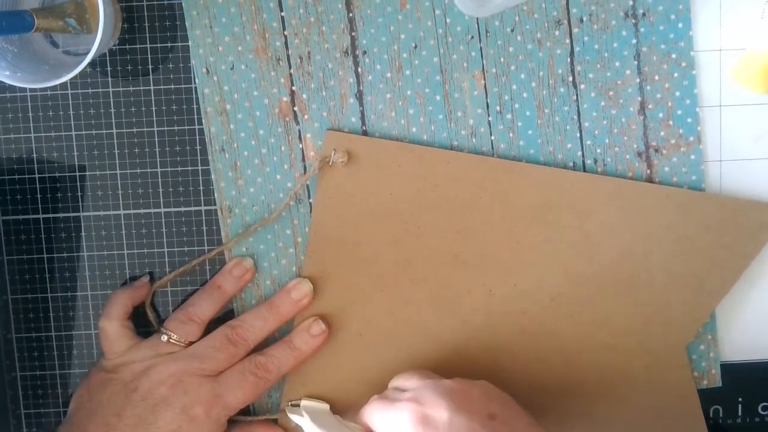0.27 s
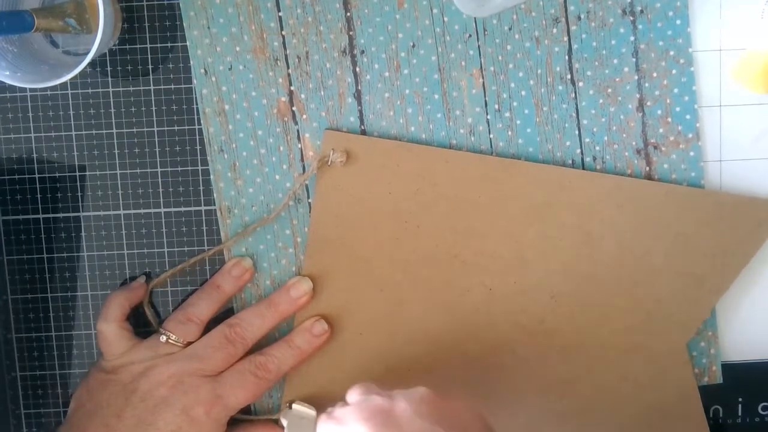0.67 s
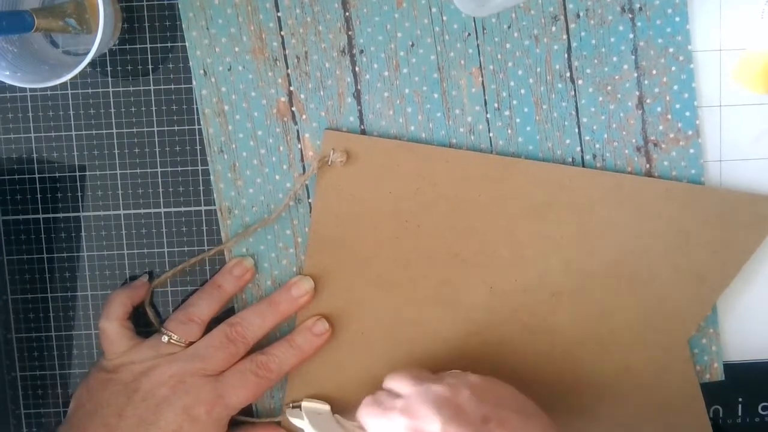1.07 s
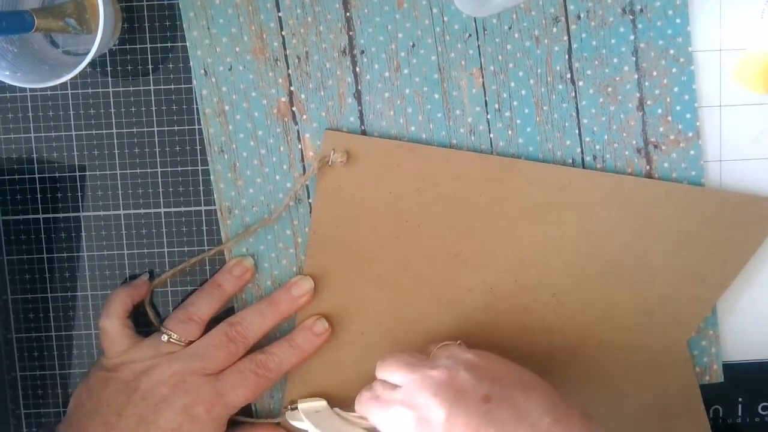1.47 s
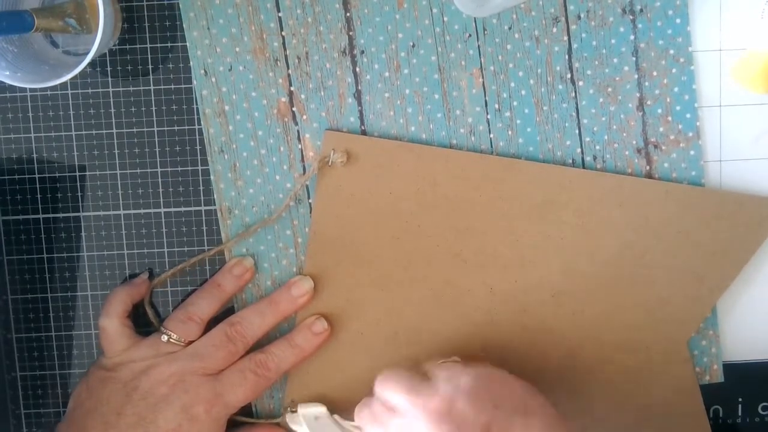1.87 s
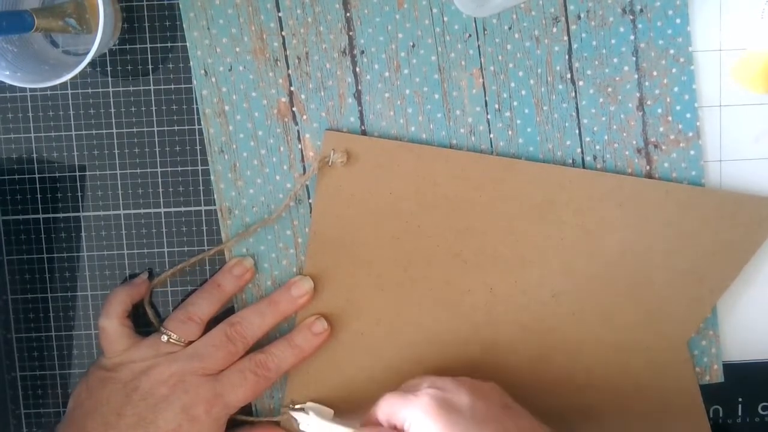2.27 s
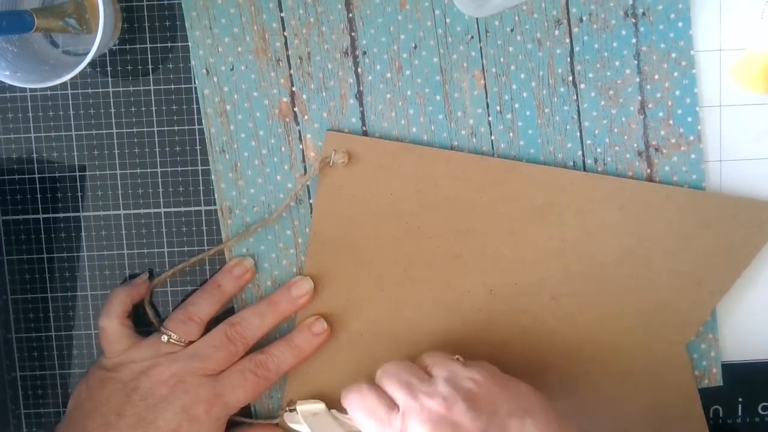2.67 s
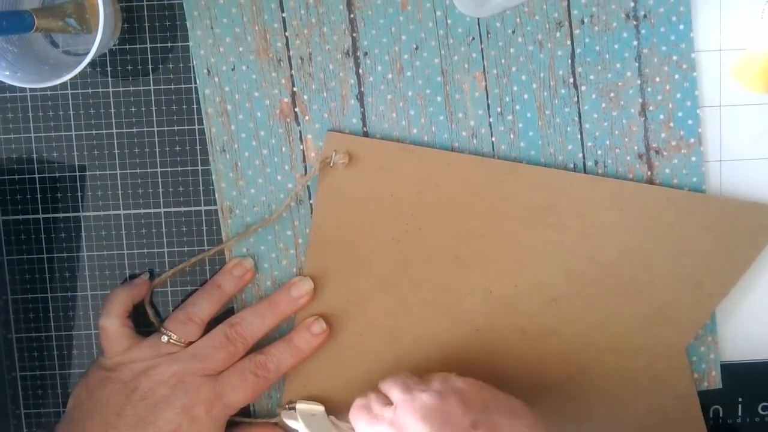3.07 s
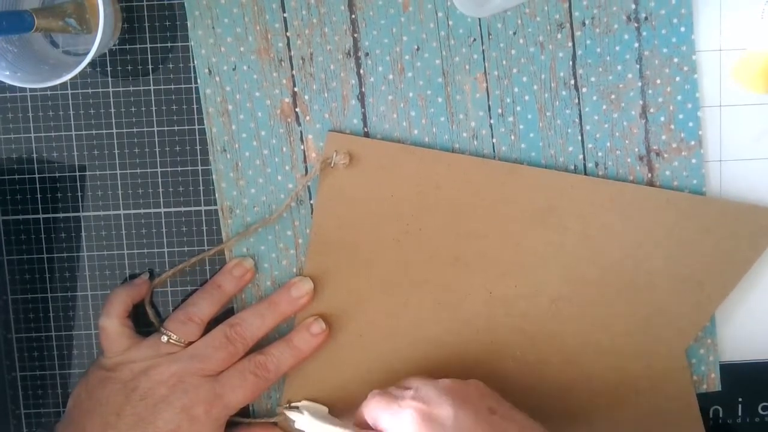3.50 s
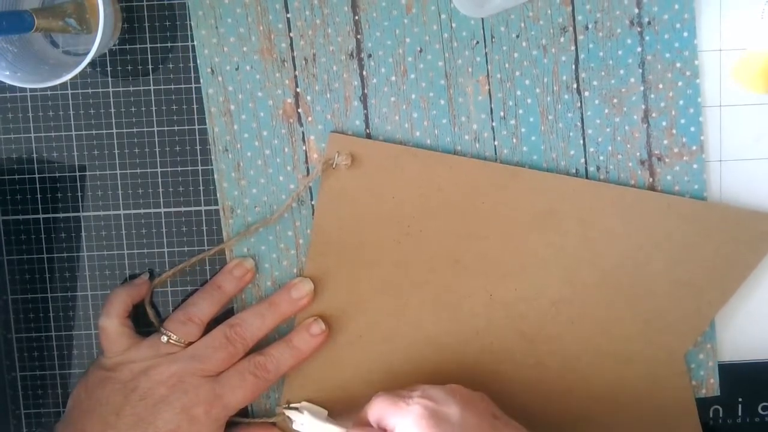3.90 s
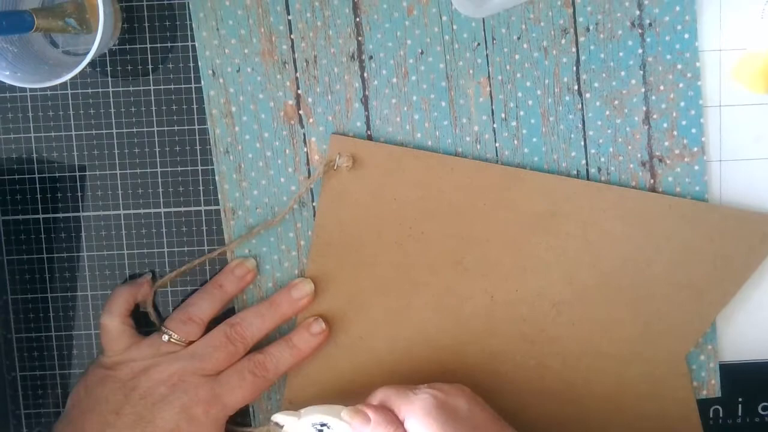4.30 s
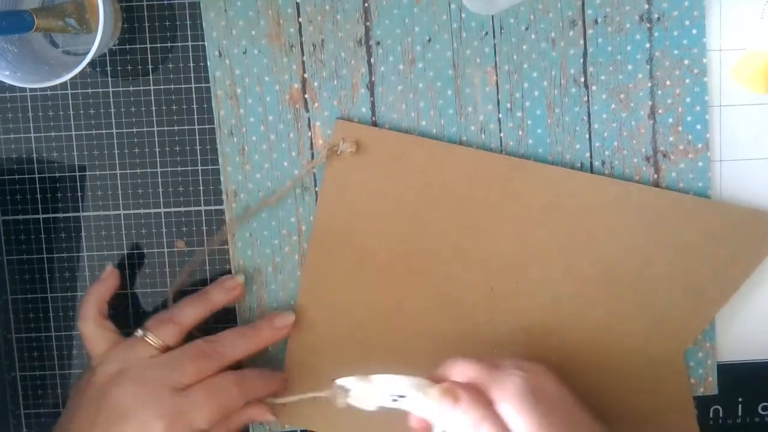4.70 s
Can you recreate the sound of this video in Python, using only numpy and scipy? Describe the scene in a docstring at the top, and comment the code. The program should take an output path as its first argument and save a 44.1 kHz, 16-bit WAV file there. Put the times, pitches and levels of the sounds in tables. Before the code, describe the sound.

Close up, in a small, dry room, soft uneven ticks and knocks come from a thin wooden board as a metal tool levers at a staple. Faint scrapes and tiny steel clinks fall between them. Near the end the staple releases with a single loud, sharp crack, and the board bumps the table. A little clinking follows over quiet room hiss and hum.

```python
"""Prying a staple from a board

A steel staple remover levers a staple out of a thin wooden board on a craft table, close up.
The staple gives in jerks that knock the board, the blade clinks and scrapes by stick-slip, and
the staple lets go with one loud snap that rings steel and wood. A low drone swells briefly at
the start. Behind lies a small, dry room with hiss, hum and a faint electronic whine."""
import sys
import numpy as np
from scipy import signal
from scipy.fft import rfft, irfft, next_fast_len
from scipy.io import wavfile
from scipy.ndimage import map_coordinates

SR = 44100
rng = np.random.default_rng(int(sys.argv[2]) if len(sys.argv) > 2 else 0)


def waveform_to_disk(signal):
    """Save audio, clipped to [-1, 1], as 16-bit WAV at the path in sys.argv[1]."""
    frames = np.transpose(np.atleast_2d(signal))
    scaled = np.clip(frames, -1, 1) * 32767
    samples = np.round(scaled).astype(np.int16)
    wavfile.write(sys.argv[1], SR, samples)


N = 213796

# blade resonances: pitch_hz, width_hz, gain_db
STEEL_MODES = [(1810, 290, -5), (3170, 180, -8.5), (3660, 160, -5), (3927, 210, 7.5), (4030, 420, 5),
               (6310, 260, -10), (7814, 190, -2.5), (9150, 290, -19), (10720, 280, -6.5), (11400, 550, -21),
               (14340, 6500, -24)]
# board resonances: pitch_hz, width_hz, gain_db
BOARD_MODES = [(109, 61, -15), (172.9, 150, -5.5), (299.8, 14, -1.5), (485, 77, -8), (567, 45, -0.5),
               (690, 113, 0.5), (846, 144, -1.5), (1017, 73, 1.5), (1310, 150, -15.5), (1760, 110, -18.5),
               (1990, 230, -27.5), (3958, 710, -10)]
# staple legs tear free, board drops back: start_s, steel_db, favoured_hz, board_db, table_db
SNAP_IMPACTS = [(4.0443, -0.5, 7820, -6.5, -31), (4.0472, -10, 4010, -9.5, -44),
                (4.0538, -8, 10720, -16, -20), (4.0547, -13, 3900, -6, -19), (4.0748, -25.5, 7500, -9, -21),
                (4.083, -33.5, 7350, -13, -33)]


def snap():
    """The staple lets go with a crack: the blade rings, the board springs back and thumps the table."""
    out = np.zeros(N)
    for start_s, steel_db, favoured_hz, board_db, table_db in SNAP_IMPACTS:
        blade = contact(STEEL_MODES, favoured_hz, width_hz=1100, spread=0.54)
        wood = contact(BOARD_MODES, 670, width_hz=290, spread=0.45)
        ring = impact(blade, grit=0.45, t60_s=0.012)
        crack = impact(lambda f: resonance(f, 1900, 4100), grit=0.74, t60_s=0.04)
        knock = impact(wood, grit=0.035, t60_s=0.02)
        thump = impact(lambda f: resonance(f, 170, 220) ** 2, grit=0.035, t60_s=0.027)
        add(out, start_s, amp(steel_db) * (ring + amp(-14.5) * crack))
        add(out, start_s, amp(board_db - 1) * knock + amp(table_db - 1.5) * thump)
    return out


# jerks of the staple: start_s, level_db, favoured_hz, thud_re_knock_db
JERKS = [(0.294, -33.5, 943, -8), (0.415, -30, 940, -8.5), (0.532, -28, 940, -8), (0.595, -36, 980, -6),
         (0.87, -37.5, 860, -6), (0.939, -46.5, 660, -17), (1.048, -45, 640, -19), (1.315, -37, 667, -6),
         (1.432, -27, 994, -5), (1.912, -47.5, 660, -3), (2.539, -36, 920, -17), (2.717, -24.5, 980, -9),
         (2.909, -43, 1000, -8), (2.986, -39.5, 710, -2.5), (3.034, -42.5, 730, -6), (3.188, -31, 703, -12),
         (3.373, -29.5, 850, -6), (3.604, -46, 700, -10), (3.706, -45, 690, -16), (3.831, -40, 770, -4.5),
         (3.903, -45.5, 806, -0.5), (3.945, -41, 740, -3), (4.014, -43.5, 690, -2), (4.634, -42, 670, -3)]


def ticks():
    """Each jerk knocks the board; a blunt push adds a thud, and hard jerks splinter a few fibres."""
    dull_above_hz, hard_jerk_db = 2630, -28
    out = np.zeros(N)
    for start_s, level_db, favoured_hz, thud_db in JERKS + creep(count=7):
        width_hz = 380 * (favoured_hz / 1000) ** 3  # sharp jerks high and broad, slow ones low and hollow
        wood = contact(BOARD_MODES, favoured_hz, width_hz, spread=0.22)
        knock = impact(lambda f: wood(f) / (1 + 1j * f / dull_above_hz), grit=0.008, t60_s=0.0075)
        thud = impact(lambda f: resonance(f, 512, 460) ** 2, grit=0.014, t60_s=0.013)
        splinter = impact(lambda f: resonance(f, 3500, 1000) ** 2, grit=0.6, t60_s=0.016)
        splinter_db = -29 + 0.5 * (level_db - hard_jerk_db)
        tick = knock + amp(thud_db) * thud + amp(splinter_db) * splinter
        add(out, start_s, amp(level_db + 0.5) * tick)
    return out


def creep(count):
    """Under the first pressure the staple creeps in faint, nearly even jerks; rows as in JERKS."""
    first_s, gap_s, jitter_s = 0.014, 0.034, 0.0032
    level_db, favoured_hz, thud_db = -47, 834, -26
    return [(abs(first_s + k * gap_s + jitter_s * late), level_db + 2 * strong, favoured_hz, thud_db)
            for k, (late, strong) in enumerate(rng.standard_normal((count, 2)))]


# steel clinks, mostly the blade's tip catching; the loud one at 4.14 s is the freed staple landing: start_s,
# level_db, favoured_hz
STEEL_CLINKS = [(0.0847, -54.5, 8400), (0.4479, -49, 7940), (0.7412, -53, 8400), (0.9247, -41, 11200),
                (0.9365, -37, 9600), (0.9442, -44, 11300), (1.2438, -49, 10900), (1.3129, -43.5, 10500),
                (1.535, -38, 11100), (1.6095, -45, 10100), (2.535, -51, 10800), (2.9828, -41, 7000),
                (3.9025, -49, 8000), (3.9459, -51, 8200), (4.1448, -28, 10800), (4.2416, -47.5, 10570),
                (4.2993, -51, 8440), (4.7046, -45, 10930)]


def clinks():
    """The blade's tip catches on the staple, and once the freed staple lands: each brief scratch rings the
    steel's upper modes."""
    out = np.zeros(N)
    for start_s, level_db, favoured_hz in STEEL_CLINKS:
        tip = contact(STEEL_MODES, favoured_hz, width_hz=4000, spread=0.45)
        clink = impact(lambda f: tip(f) * f / SR, grit=0.68, t60_s=0.029)
        add(out, start_s, amp(level_db + 1) * clink)
    return out


# hand pushes on the blade: start_s, hold_s, steel_db, wood_db
BLADE_STROKES = [(0.607, 0.043, -76, -54), (0.915, 0.054, -58, -56.5), (1.03, 0.18, -66, -70),
                 (1.493, 0.086, -55.5, -51.5), (1.643, 0.17, -72, -57), (1.912, 0.0095, -59.5, -56),
                 (2.203, 0.067, -76, -56.5), (2.545, 0.097, -68, -50.5), (2.722, 0.19, -69, -52.5),
                 (2.94, 0.039, -62, -44.5), (3.064, 0.16, -70.5, -52.5), (3.448, 0.096, -76, -53.5),
                 (4.624, 0.02, -55.5, -51)]


def scraping():
    """With each stroke the blade hisses along the staple and rubs on the wood."""
    steel_gain, wood_gain = amp(-77.5), amp(-73)  # the blade stirs a little between strokes
    for start_s, hold_s, steel_db, wood_db in BLADE_STROKES:
        push = swell(start_s, hold_s, attack_s=0.034, release_s=0.022)
        steel_gain = np.maximum(steel_gain, amp(steel_db - 5) * push)
        wood_gain = np.maximum(wood_gain, amp(wood_db - 6.5) * push)
    tip = contact(STEEL_MODES, 12000, width_hz=3000, spread=0.2)
    wood = contact(BOARD_MODES, 980, width_hz=390, spread=0.97)
    hiss = stick_slip(lambda f: tip(f) * f / SR, slips_per_s=1500)
    rub = stick_slip(wood, slips_per_s=300)
    return steel_gain * hiss + wood_gain * rub


def drone(pitch_hz=122):
    """A short, low, slightly unsteady hum with a weak octave."""
    phase = 2 * np.pi * pitch_hz * np.arange(N) / SR + 0.25 * wobble(23)
    envelope = swell(start_s=0.056, hold_s=0.057, attack_s=0.14, release_s=0.024)
    return amp(-52) * envelope * unit_rms(np.sin(phase) + amp(-9) * np.sin(2 * phase))


# room decay: frequency_hz, t60_s
ROOM_DECAY = [(100, 0.36), (700, 0.23), (2000, 0.17), (4000, 0.26), (8000, 0.17), (15000, 0.14)]


def room(x, tail_db, echo_db, echo_delay_s=0.0078, build_up_s=0.0011):
    """Adds one echo off the table and a short diffuse tail that builds up and dies."""
    hz, t, spectrum = signal.stft(rng.standard_normal(SR // 2), SR, nperseg=256)
    decay = amp(-60 * t / log_interp(ROOM_DECAY, hz)[:, None])
    tail = signal.istft(spectrum * decay, SR, nperseg=256)[1]
    tail *= 1 - np.exp(-(np.arange(len(tail)) / SR / build_up_s) ** 2)
    reflections = amp(tail_db) * tail / np.linalg.norm(tail)
    reflections[round(echo_delay_s * SR)] += amp(echo_db)
    return x + signal.fftconvolve(x, reflections)[:N]


# room noise spectrum: frequency_hz, relative_density_db
AIR_SPECTRUM = [(12, -24), (20, 6), (142, -7), (319, -12), (759, -17.5), (923, -23), (1030, -36.5),
                (1220, -23.5), (1960, -30.5), (4060, -28.5), (6910, -36.5), (8180, -29), (9140, -34),
                (11100, -35), (16000, -36)]
# room hum: pitch_hz, rms_db
HUM_TONES = [(119.5, -65), (209.9, -69.5)]
# electronic whine: pitch_hz, rms_db
WHINE_TONES = [(8000, -79.5), (8398, -77.5), (12199, -79.5), (12602, -86.5)]


def background():
    """Room rumble and hiss, with a slightly unsteady hum and whine."""
    t = np.arange(N) / SR
    air_gain = amp(-56.5 + 0.67 * wobble(2.3))
    air = filtered(rng.standard_normal(N), lambda f: amp(log_interp(AIR_SPECTRUM, f)))
    out = air_gain * unit_rms(air)
    for pitch_hz, rms_db in HUM_TONES + WHINE_TONES:
        peak = np.sqrt(2) * amp(rms_db + 2.4 * wobble(1.9))
        out += peak * np.sin(2 * np.pi * pitch_hz * t + 0.5 * wobble(2.7))
    return out


def mic_housing(x, dip_hz=4950, width_hz=1500):
    """The microphone's housing hollows out one treble band."""
    return filtered(x, lambda f: 1 - resonance(f, dip_hz, width_hz))


def impact(response, grit, t60_s):
    """A sharp push and a gritty tail dying over t60_s ring through a response; peak 1."""
    t = np.arange(SR // 4) / SR
    force = grit * rng.standard_normal(len(t)) * amp(-60 * t / t60_s)
    force[0] += 1
    ring = filtered(force, response)
    return ring / np.abs(ring).max()


def stick_slip(response, slips_per_s, scatter_db=3.5):
    """Tiny slips of uneven size at random moments excite a response; rms 1."""
    slips = rng.random(N) < slips_per_s / SR
    sizes = amp(scatter_db * np.clip(rng.standard_normal(N), -2, 2))
    signs = rng.choice([-1, 1], N)
    return unit_rms(filtered(slips * sizes * signs, response))


def contact(modes, favoured_hz, width_hz, spread):
    """A body's response where the place of contact favours the modes near one frequency."""
    return lambda f: body(f, modes) * (spread + resonance(f, favoured_hz, width_hz))


def body(f, modes):
    """Summed modes; neighbours swing in opposite senses."""
    return sum((-1) ** k * amp(gain_db) * resonance(f, pitch_hz, width_hz)
               for k, (pitch_hz, width_hz, gain_db) in enumerate(modes))


def resonance(f, centre_hz, width_hz):
    """One damped mode, gain 1 at its centre."""
    return 1j * f * width_hz / (centre_hz ** 2 - f ** 2 + 1j * f * width_hz)


def swell(start_s, hold_s, attack_s, release_s):
    """Exponential rise to 1 at start_s, hold, exponential decay."""
    t = np.arange(N) / SR - start_s
    return np.exp(np.minimum(t, 0) / attack_s - np.maximum(t - hold_s, 0) / release_s)


def wobble(knots_per_s):
    """A smooth random curve."""
    knots = rng.standard_normal(int(N * knots_per_s / SR) + 4)
    return map_coordinates(knots, [np.arange(N) * knots_per_s / SR])


def filtered(x, response):
    """Applies a complex frequency response."""
    size = next_fast_len(len(x) + SR // 8)
    return irfft(rfft(x, size) * response(np.fft.rfftfreq(size, 1 / SR)), size)[:len(x)]


def log_interp(points, hz):
    """Reads (frequency_hz, value) points on a log frequency axis."""
    knots_hz, values = np.transpose(points)
    return np.interp(np.log(hz + 1), np.log(knots_hz), values)


def add(track, start_s, sound):
    """Mixes a sound into a track."""
    part = track[round(start_s * SR):][:len(sound)]
    part += sound[:len(part)]


def amp(db):
    """Decibels to gain."""
    return 10 ** (np.asarray(db) / 20)


def unit_rms(x):
    """Scales to rms 1."""
    return x / np.sqrt(np.mean(x ** 2) + 1e-20)


def scene():
    """Levering, scraping and the snap in the room; mono."""
    prying = room(ticks() + clinks() + scraping(), tail_db=-6.5, echo_db=-8.5)
    release = room(snap(), tail_db=-7.5, echo_db=-27.5)
    return (mic_housing(prying + release) + drone() + background())[None]


def record(dry):
    """Steep low-pass at the band limit."""
    cutoff_hz = 15650
    return filtered(dry[0], lambda f: 1 / np.sqrt(1 + (f / cutoff_hz) ** 160))[None]


dry = scene()
out = record(dry)
waveform_to_disk(out)
```